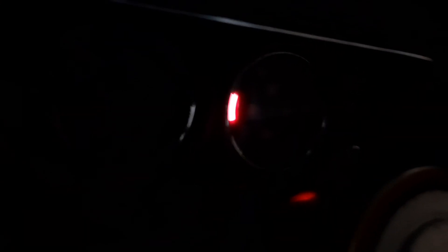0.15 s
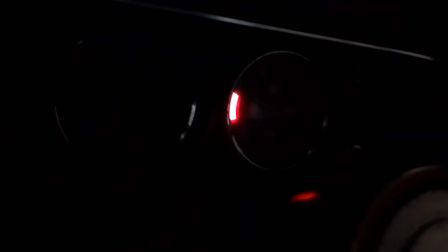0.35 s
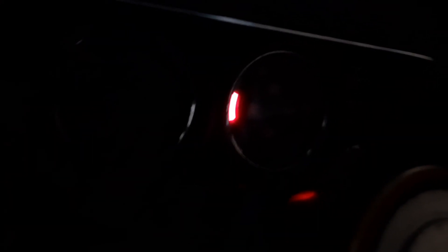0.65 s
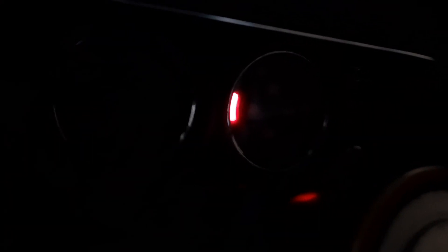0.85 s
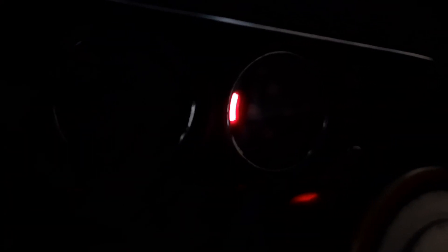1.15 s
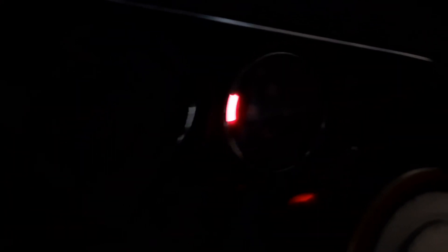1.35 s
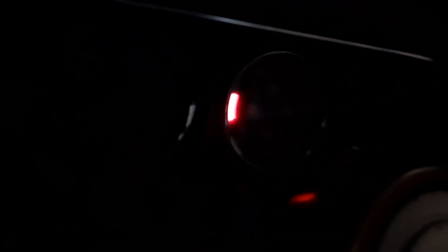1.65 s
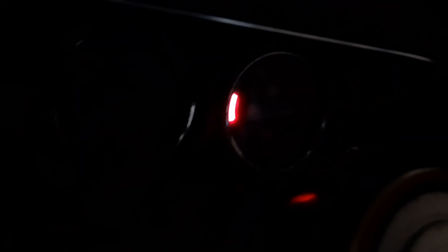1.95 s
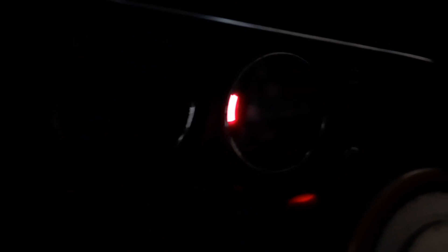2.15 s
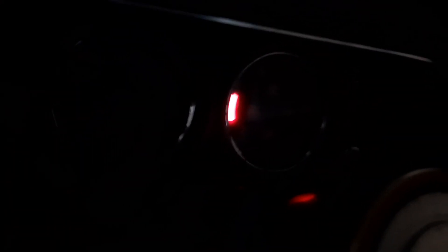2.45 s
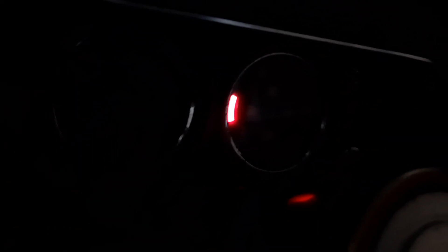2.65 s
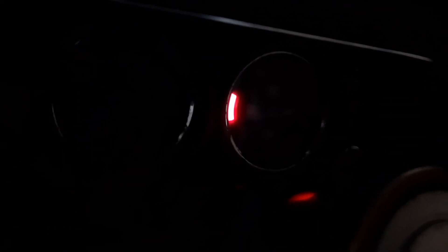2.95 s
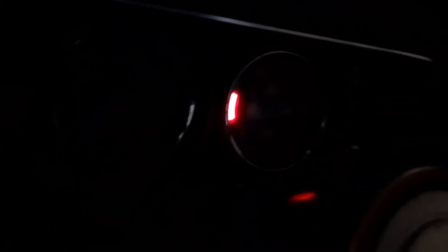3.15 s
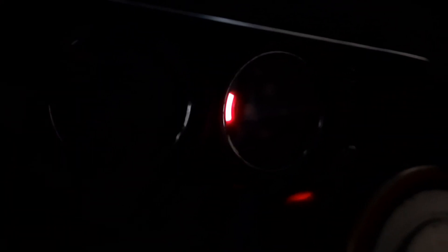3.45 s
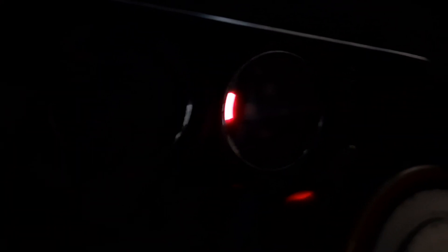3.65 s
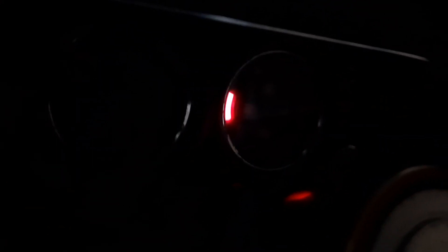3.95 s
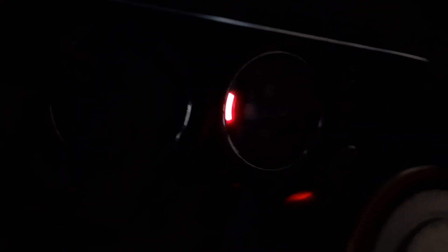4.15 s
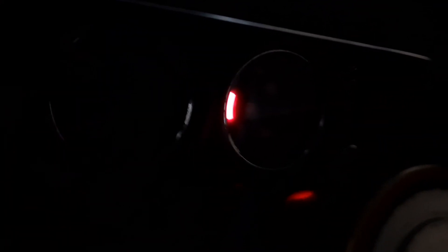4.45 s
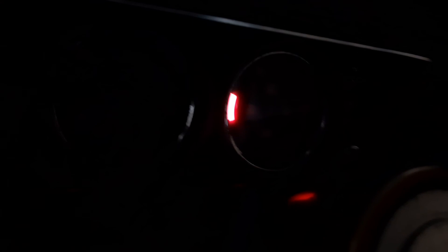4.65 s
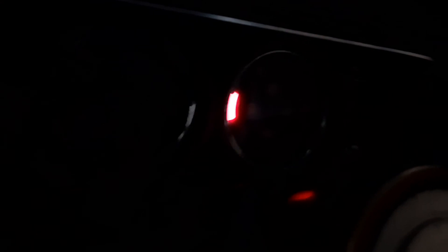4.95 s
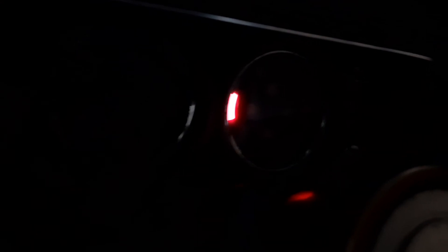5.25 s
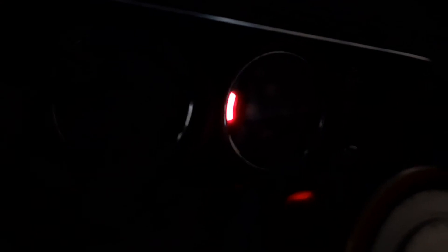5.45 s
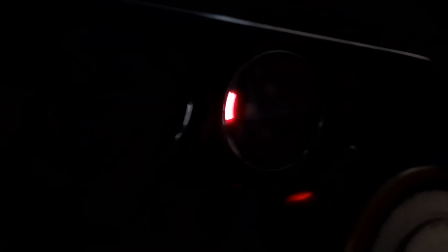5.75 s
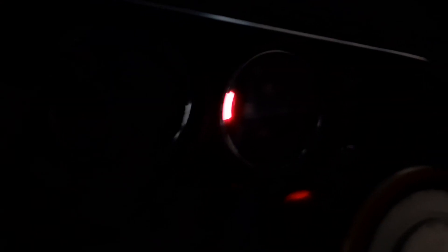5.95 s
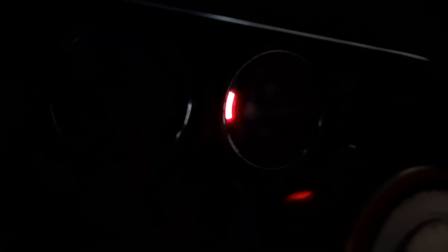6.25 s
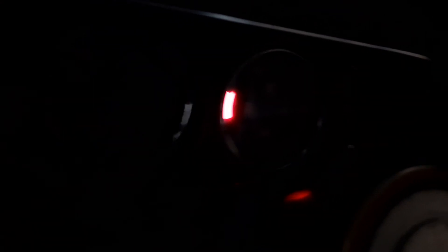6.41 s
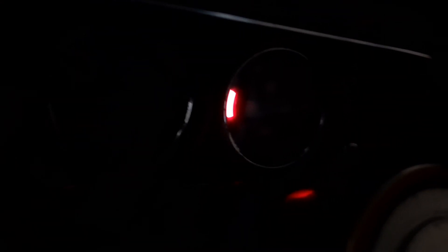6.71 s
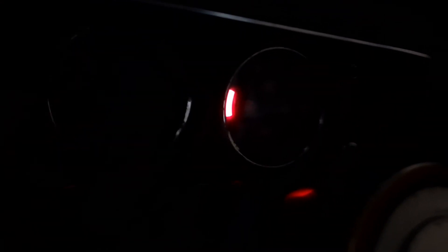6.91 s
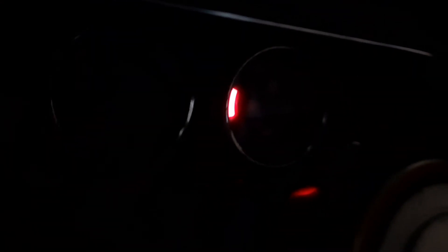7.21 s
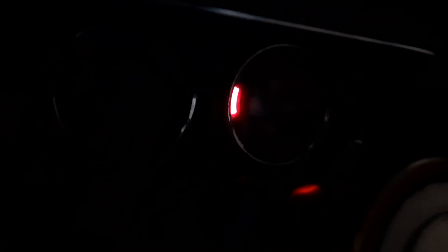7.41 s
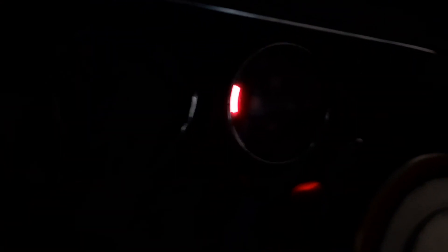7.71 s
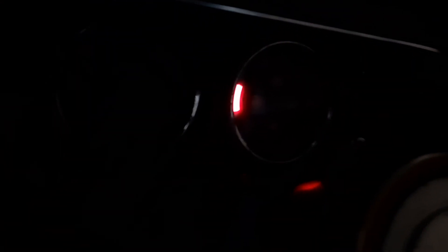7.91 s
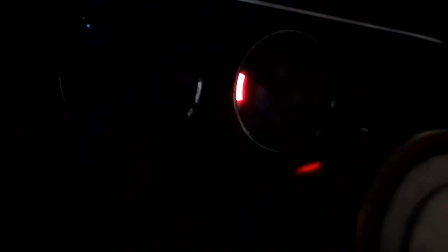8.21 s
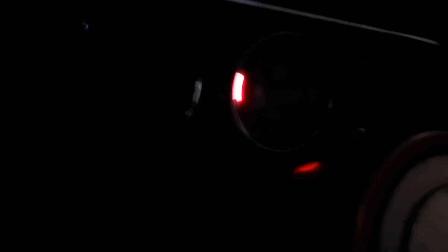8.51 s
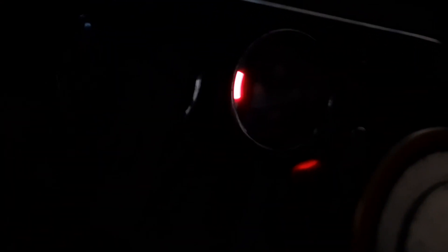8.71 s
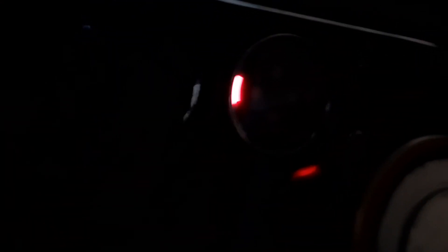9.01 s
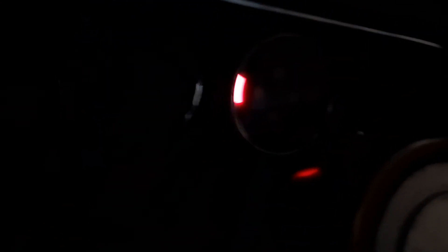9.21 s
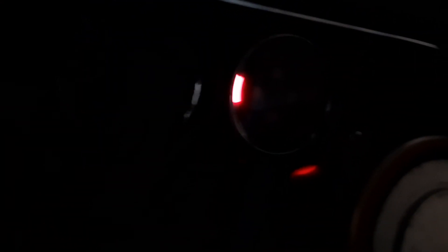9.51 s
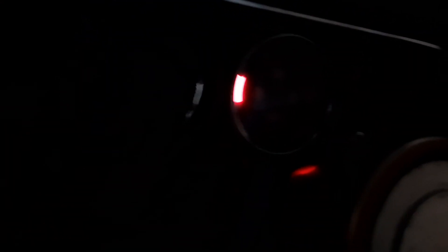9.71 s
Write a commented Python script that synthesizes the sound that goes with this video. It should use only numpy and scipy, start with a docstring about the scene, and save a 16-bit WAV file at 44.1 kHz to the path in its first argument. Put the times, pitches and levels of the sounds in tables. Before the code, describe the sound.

Heard from the driver's seat of an old car, the engine idles unevenly without stopping. A deep, lumpy exhaust rumble fills the cabin while the motor keeps faltering and popping, usually two or three quick pops in a row. Each spits and barks through a ringing, hollow muffler, stronger on the left. Low thuds, gurgles, valve ticks, soft hiss and thin metallic sizzle lie underneath.

```python
"""In front is the rough, lumpy rumble of an old car at idle, heard from the driver's seat: uneven firings ring the
exhaust and the cabin. Again and again the engine falters and the pipe pops, mostly in short runs at one pop a turn:
gas bursts spit and bark, the muffler rings, and the rumble surges after them. A few low cycles thud.
Beneath lie gurgling pipe resonances, noise for gas rush, hiss, valve ticks and a metallic sizzle,
stray plops, narrow-band belt chirps, one soft moan and a few light rustles."""
import sys
import numpy as np
from scipy import signal
from scipy.fft import rfft, irfft, next_fast_len
from scipy.io import wavfile
from scipy.ndimage import uniform_filter1d, map_coordinates

SR = 44100
rng = np.random.default_rng(int(sys.argv[2]) if len(sys.argv) > 2 else 0)


def dump_mix(stems):
    """Bounce the given channels to the path in sys.argv[1] as a 16-bit WAV at rate SR."""
    frames = np.atleast_2d(stems).T  # one column per channel
    limited = np.clip(frames, -1, 1)  # hard clip at full scale
    pcm = np.round(limited * 32767).astype(np.int16)
    wavfile.write(sys.argv[1], SR, pcm)


N = 435266

# Runs of exhaust pops, one pop a turn: start t/s, pops, turn/s, first boom level/dB, boom step/dB a pop,
# first bark level/dB, first spit level/dB, spit step/dB a pop.
# A lone pop has: t/s, boom level/dB, bark level/dB, spit level/dB. Each layer trims its own levels.
POP_RUNS = [(0.0474, -25, -30.5, -39.5), (0.1244, -23, -26, -34),
            (0.1994, 2, 0.065, -24.5, -7.5, -27, -53, -12), (0.32, 3, 0.0697, -30.5, -3.5, -36, -43.5, -10),
            (0.6135, -35, -43, -60), (0.7885, 2, 0.0658, -32.5, -2.5, -39, -50.5, -6.0),
            (1.0152, 2, 0.0671, -36, 3.5, -39.5, -57, 8),
            (1.262, 2, 0.0667, -28.5, -7.5, -35.5, -42.5, -18),
            (1.447, 2, 0.0715, -45, 10.5, -44.5, -46.5, 2.5),
            (1.5868, 3, 0.071, -27.5, -4, -31, -38.0, -14), (1.7726, 2, 0.0629, -36.5, 3, -44, -46.0, -4.0),
            (2.0602, -31.5, -37, -51), (2.2521, 2, 0.07, -29, 2, -35, -38.5, -5.5), (2.395, -35, -42, -55),
            (2.5481, -33, -41, -62), (2.7287, 2, 0.0678, -30.5, -3.5, -37, -43.5, -9),
            (3.024, 2, 0.0626, -30.5, -6.5, -38, -47.5, -16), (3.2127, -28.5, -34.5, -38),
            (3.283, 2, 0.072, -26.5, -9.5, -33, -47, -10), (3.5211, 3, 0.0644, -31.5, 0, -36, -42, -3.5),
            (3.7239, -24.5, -30.5, -37.5), (3.802, 2, 0.07, -24, -7, -29.5, -43.5, -8),
            (4.0286, 3, 0.0747, -33.5, 1, -40, -43, -2),
            (4.3837, 3, 0.0735, -25.5, -.3, -29.5, -39.5, -2.5), (4.606, -27, -32, -40.5),
            (4.6814, -21.5, -28.5, -36), (4.7565, 2, 0.07, -24.5, -11.5, -27, -59, -3),
            (4.9162, -36, -46, -56), (5.1534, 3, 0.0604, -32.5, -6, -37.5, -47.5, -12.0),
            (5.3453, 3, 0.0709, -30, -1, -35, -41.5, -5), (5.5963, -45, -47, -47.5),
            (5.6635, 2, 0.0649, -30.5, -4, -35.5, -42, -10.5),
            (5.8516, 3, 0.0696, -29.5, -5.5, -34, -41, -13.0),
            (6.1377, 2, 0.0661, -32, -5, -34, -49.0, -16), (6.3261, 2, 0.0699, -30, -1, -34, -40, -12),
            (6.6256, 2, 0.0725, -35, 1, -40, -47.5, 3), (6.778, -30, -35, -51), (6.888, -35, -36, -62),
            (6.9746, 2, 0.0729, -27, 3, -28, -38, -9), (7.1767, -30, -32.5, -51),
            (7.246, 2, 0.0751, -25.5, -5, -32, -44, -20), (7.4261, 2, 0.0658, -34.5, -0.5, -36, -44.5, -9),
            (7.6606, 2, 0.0629, -37.5, 2.5, -43, -67, 0.5), (7.8858, 2, 0.0629, -33, -3, -39.5, -60.0, 1),
            (8.0705, 2, 0.0731, -34, 2, -35.5, -45, 5),
            (8.2163, 2, 0.0702, -27.5, -4.5, -30.5, -39.5, -17.5),
            (8.399, 2, 0.0685, -38, 5, -37.5, -43.5, 1), (8.6496, 2, 0.0653, -30.5, -7, -35, -43, -5.5),
            (8.8914, 2, 0.065, -37, 2.5, -41.5, -48.5, 3.0),
            (9.135, 2, 0.0646, -34.5, -2, -35.5, -44, -12.5),
            (9.3645, 2, 0.0678, -37.5, 3.5, -42.5, -56, 6.5), (9.5513, -42, -43, -46.5),
            (9.6261, 2, 0.0704, -31.5, 4.5, -35, -39, -2.5), (9.7657, -36, -42, -60)]
# Resonances of the low exhaust note in pipe and cabin: f/Hz, width/Hz, level/dB
RUMBLE_MODES = [(37, 11.4, -1), (63, 8.3, 1), (83, 27, -3), (102.9, 11.4, -3)]
# Resonances of the throb above it: f/Hz, width/Hz, level/dB
THROB_MODES = [(132.2, 20, 0), (155.8, 24, -1.5), (190.3, 46, -8.5)]
# Slow swell of the rumble, before its trim: t/s, level/dB
RUMBLE_CURVE = [(0.0, -19), (0.1, -32), (0.6, -25.5), (0.7, -28.5), (1.5, -29.5), (2.2, -27), (2.9, -31),
                (3.0, -26), (3.2, -30.5), (3.4, -29), (3.6, -33), (3.85, -25), (4.2, -33.5), (4.9, -26),
                (5.1, -35), (5.2, -28), (6.2, -30.5), (6.6, -27), (6.7, -33.5), (6.9, -33.5), (7.1, -26.5),
                (8.1, -30), (8.2, -27), (8.4, -26), (8.8, -31), (9.87, -28)]
# Slow swell of the throb, before its trim: t/s, level/dB
THROB_CURVE = [(0.0, -28), (0.3, -33.5), (0.4, -23.5), (0.8, -39.5), (1.0, -31), (1.4, -33.0), (2.42, -30),
               (2.7, -37.5), (2.9, -32.5), (3.6, -35), (3.83, -29), (4.3, -37), (4.6, -30), (5.0, -33),
               (6.2, -35.5), (7.0, -34), (7.28, -24.5), (7.6, -35), (8.2, -31), (8.6, -35), (8.7, -32.5),
               (8.9, -44), (9.0, -37), (9.5, -34.5), (9.7, -29), (9.87, -35)]
# Heavy firings that thud in the cabin, before the thud trim: middle t/s, f/Hz, level/dB
THUD_HITS = [(0.191, 77, -19.5), (0.409, 68.2, -19.5), (0.515, 69.6, -18.5), (0.654, 72, -22.5),
             (0.915, 63, -24.5), (1.105, 66.6, -21), (1.615, 69.6, -26), (1.706, 66, -22),
             (1.897, 69.6, -19.5), (2.089, 58, -20.5), (2.205, 63, -20.5), (2.373, 67, -19),
             (2.446, 74.6, -24), (2.511, 61, -20.5), (2.577, 68.6, -22), (2.754, 64, -25.5),
             (3.047, 69, -21), (3.337, 58, -18.5), (3.784, 62.5, -18), (4.703, 68.5, -18.8),
             (4.811, 56.4, -23), (4.98, 63, -18), (5.18, 65.6, -20), (5.435, 71.6, -20.5),
             (5.536, 63, -24.5), (5.731, 70, -27), (5.882, 65.6, -24), (5.973, 68, -22), (6.166, 69, -24),
             (6.352, 65.3, -21), (6.457, 57.3, -21.7), (7.071, 85, -21), (7.159, 73, -20),
             (7.283, 82.4, -17), (7.35, 79, -20), (7.495, 64, -22.5), (7.583, 64, -23.5),
             (7.785, 68.4, -22), (8.238, 67.6, -18), (8.48, 72.5, -18.9), (9.454, 67, -23.5),
             (9.719, 64, -19.5), (9.819, 70.5, -25)]
# Ways from the valve to the seat: delay/s, level/dB, centre f/Hz, width/octaves
VALVE_TO_SEAT = [(.0055, -6, 1100, 2.4), (.0122, -5.5, 1100, 0.45), (.0175, 2.5, 430, 0.88),
                 (0.0272, 1, 600, 0.37)]
# Muffler resonances: f/Hz, width/Hz, level/dB
MUFFLER_MODES = [(281.4, 29, -4), (350.7, 20, 1), (430, 49, -0.5), (537, 33, -4.5), (610.4, 53, -8),
                 (650, 114, -14), (816, 40, -17), (1067, 55, -8), (1279, 18, -13), (1470, 110, -17),
                 (1915, 30, -14.5)]
# Colour of the bark from the pipe: f/Hz, relative level/dB per Hz
BARK_SPECTRUM = [(150, -40), (250, -22), (450, 1.5), (800, 4.5), (930, 1), (1100, 2.5), (1400, 1.5),
                 (1950, -5), (2200, -14), (3000, -22.5), (6000, -56)]
# Colour of the spitting gas: f/Hz, relative level/dB per Hz
SPIT_SPECTRUM = [(500, -18), (1100, -2.5), (2000, -3), (2550, -0.5), (3150, 2.5), (3900, -5.5),
                 (5500, -11.5), (6400, -13), (7500, -16), (9500, -24), (15500, -34)]
# Colour of the snap that opens a pop: f/Hz, relative level/dB per Hz
SNAP_SPECTRUM = [(2000, -12), (4200, -2), (6400, 7), (8500, -5.5), (12000, -5), (15500, -12)]
# Peaks and dips in the colour of the pipe: f/Hz, width/Hz, level/dB
PIPE_COLOUR = [(490, 35, -2.5), (535, 38, 1.5), (930, 61, -5.5), (1060, 87, 2.5), (1282, 24, 4.5),
               (1410, 55, 0.5), (1770, 70, -1), (1920, 70, 4)]
# Peaks and dips from sheet metal and cabin in the treble: f/Hz, width/Hz, level/dB
PANEL_COLOUR = [(2257, 45, 3.5), (2570, 39, 1), (2670, 30, 4.5), (2880, 60, -1), (3150, 130, 3),
                (3380, 70, -6.5), (3415, 60, 7), (3920, 55, 4.5), (5180, 60, 5), (6000, 150, 1),
                (6270, 120, 4)]
# Resonances that the gurgle rings: f/Hz, width/Hz, level/dB
GURGLE_MODES = [(286, 57, -5), (602.5, 46, -0.5), (760, 270, -15.5)]
# Spells in which the pipe burbles more: middle t/s, half length/s, rise level/dB
GURGLE_SPELLS = [(.25, .12, 10), (1.004, 0.21, 9), (1.619, .12, 2), (2.06, 0.23, 12), (3.682, 0.093, 3),
                 (4.7, .15, 8), (5.3, 0.24, 5.5), (7.094, 0.16, 12), (8.023, 0.15, 12), (9.602, 0.17, 3.5)]
# Stray plops in the pipe: start t/s, level/dB, centre f/Hz
STRAY_PLOPS = [(.937, -34, 800), (2.188, -41.5, 2580), (7.54, -43, 3000), (7.846, -28.5, 515),
               (7.991, -26, 580)]
# Colour of the gas rush: f/Hz, relative level/dB per Hz
RUSH_SPECTRUM = [(150, -46), (235, -8), (290, -2), (430, -3), (490, -5.5), (600, -10.5), (920, -10),
                 (1050, -14.5), (1200, -17), (1430, -16.5), (2430, -28), (3200, -29.5), (5000, -46)]
# Colour of the engine hiss: f/Hz, relative level/dB per Hz
HISS_SPECTRUM = [(1290, -13), (2200, -2), (2750, -6.5), (3110, -5.5), (4070, -8), (4840, -6.5), (5710, -12),
                 (7010, -7), (7990, -11.5), (8820, -24.5), (11000, -19.5), (11900, -15.5), (13000, -22),
                 (15700, -25)]
# Slow swell of the hiss, before its trim: t/s, level/dB
HISS_CURVE = [(0.0, -53.5), (1.2, -61), (1.8, -57.5), (1.9, -58.5), (2.4, -58), (3.1, -58.5), (3.3, -55),
              (3.5, -60), (3.6, -55.5), (4.3, -62), (4.7, -53.5), (5.2, -62.5), (5.4, -57.5), (6.2, -58.5),
              (6.4, -55.5), (6.5, -56.5), (7.5, -56), (7.8, -58.5), (8.2, -56), (9.6, -59), (9.7, -55),
              (9.87, -58)]
# Colour of the valve ticks: f/Hz, relative level/dB per Hz
TICK_SPECTRUM = [(800, -17), (2200, 8.0), (4500, 1.5), (7500, -1.5), (9500, -5.0), (15500, -8)]
# Sizzle after hard pops, before its trim: start t/s, length/s, level/dB
SIZZLE_SPELLS = [(.125, 0.8, -65), (1.52, 0.3, -61), (2.25, 0.32, -63), (3.209, 0.2, -61),
                 (3.52, 0.44, -62), (4.379, 0.17, -67), (4.606, .45, -60), (6.28, 0.28, -62),
                 (6.972, 0.58, -58), (8.074, 0.63, -59.5), (9.131, .2, -62), (9.618, .25, -61)]
# Colour of the sizzle: f/Hz, relative level/dB per Hz
SIZZLE_SPECTRUM = [(3000, -18), (6000, 1), (7400, 5.5), (8800, -3.5), (10800, -3), (12100, -1),
                   (13200, -2.5), (15500, -5)]
# Belt chirps: middle t/s, length/s, f/Hz, level/dB
BELT_CHIRPS = [(.575, 0.052, 7394, -56), (1.69, 0.061, 7260, -53), (1.8, 0.042, 7510, -57),
               (7.21, 0.055, 7730, -55), (8.66, 0.053, 7040, -56), (9.41, 0.048, 7170, -58)]
# Light rustles: middle t/s, length/s, level/dB
LIGHT_RUSTLES = [(0.164, 0.017, -45), (6.29, 0.012, -45), (6.714, .012, -54), (6.974, 0.024, -44),
                 (7.44, 0.029, -55), (7.626, .005, -47), (8.078, .007, -51)]
# Colour of the rustles: f/Hz, relative level/dB per Hz
RUSTLE_SPECTRUM = [(1000, -6), (4000, 1), (7500, -3), (10000, -8), (15000, -5)]
# Stereo lean of the pops, stronger in the ear nearer the pipe: f/Hz, left minus right level/dB
POP_LEAN = [(100, 0), (300, 14), (420, 19), (600, 3.5), (1000, 7.5), (2000, 8), (4000, 7.5), (12000, 7)]
# Stereo lean of the steady engine sounds: f/Hz, left minus right level/dB
BED_LEAN = [(100, 1.2), (300, 0.83), (420, 5.5), (600, 0.5), (1000, 6.4), (3000, 3.2), (6000, 3),
            (7500, 0.5), (8800, 7.4), (12000, 1.5), (15000, 2)]
# Likeness of the two ears before the lean: f/Hz, correlation
EAR_LIKENESS = [(35, 0.94), (70, 0.92), (160, 0.99), (300, 0.64), (600, 0.52), (1100, 0.018),
                (10000, 0.021)]

# Share of the boom and spit steps that the bark follows along a run
BARK_WITH_BOOM, BARK_WITH_SPIT = 0.9, 0.076
# Soft pops on the free turns: mean and scatter, before the layer trims
SOFT_POP_DB, SOFT_SCATTER_DB = -52, 3
# The falter peaks ahead of each run
FALTER_LEAD_S, FALTER_HALF_S = 0.034, 0.08
# A pop with this boom in the table gives a surge of 1
FULL_POP_DB = -26.5
THUD_HALF_S, THUD_TRIM_DB = 0.023, -3
TOP_HZ = 15820


def hard_pops():
    """Backfires of every run, one a turn, as rows: time, boom dB, bark dB, spit dB."""
    pops = []
    for run in POP_RUNS:
        if len(run) == 4:
            pops.append(run)
            continue
        start, count, turn, boom, boom_step, bark, spit, spit_step = run
        bark_step = BARK_WITH_BOOM * boom_step + BARK_WITH_SPIT * spit_step
        for k in range(count):
            pops.append((start + k * turn, boom + k * boom_step, bark + k * bark_step, spit + k * spit_step))
    return np.transpose(pops)


def firings(turn_s=0.068, jitter_s=0.0012):
    """Jittered firing times, four a turn; the hard pops mark whole turns of the crank."""
    pop_times = np.sort(hard_pops()[0])
    marks = np.r_[pop_times[0] - turn_s, pop_times, pop_times[-1] + 2 * turn_s]
    turns_between = np.maximum(np.round(np.diff(marks) / turn_s), 1)
    turns = np.r_[0, np.cumsum(turns_between)]
    times = np.interp(np.arange(0, turns[-1], 1 / 4), turns, marks)
    return np.abs(times + jitter_s * rng.standard_normal(len(times)))


def falter():
    """Dips of engine effort ahead of each run, as smooth humps that add where they overlap."""
    starts = np.array([run[0] for run in POP_RUNS]) - FALTER_LEAD_S
    t = np.arange(-SR // 4, SR // 4) / SR
    hump = np.exp(-(t / FALTER_HALF_S) ** 2)
    return signal.fftconvolve(impulses(starts, np.ones(len(starts))), hump, "same")


def surge(lag, length):
    """Extra effort that peaks lag seconds after each hard pop and adds up as power over a run."""
    times, boom_db = hard_pops()[:2]
    t = np.arange(SR) / SR
    hump = np.exp(-((t - lag) / length) ** 2)
    power = signal.fftconvolve(impulses(times, amp(boom_db - FULL_POP_DB) ** 2), hump)[:N]
    return np.sqrt(np.abs(power))


def driven(times, modes, lag, uneven, kick, turbulence, low_hz, high_hz):
    """Uneven pulses, kicked harder by pops, ring resonances lag seconds later; the slow level is evened to 1."""
    pop_times, boom_db = hard_pops()[:2]
    push = impulses(times + lag, 1 + uneven * rng.standard_normal(len(times)))
    push += kick * impulses(pop_times + lag, unit(amp(boom_db)))
    sideways = impulses(times + lag, rng.standard_normal(len(times)))
    pair = np.array([unit(push), unit(sideways)]) + turbulence * rng.standard_normal((2, N))

    def colour(hz):
        band = 1 / np.sqrt((1 + (low_hz / (hz + 1)) ** 12) * (1 + (hz / high_hz) ** 8))
        return resonances(modes, hz) * band

    out = spread(pair, colour, BED_LEAN)
    power = uniform_filter1d(out.mean(axis=0) ** 2, size=4000)
    power = uniform_filter1d(power, size=3000)
    return out / np.sqrt(np.abs(power) + 1e-6)


def exhaust_rumble(times, miss):
    """Firings ring the lumpy low note of pipe and cabin: it sags at a miss, thumps with pops and swells after."""
    thump, swell = surge(lag=0.049, length=0.049), surge(lag=0.28, length=0.041)

    def level(slow, trim_db, miss_db, thump_db, swell_db, lump_db):
        effort_db = thump_db * thump + swell_db * swell - miss_db * miss
        return amp(curve(slow) + trim_db + effort_db + lump_db * wobble(13))

    rumble = driven(times, RUMBLE_MODES, lag=0.01377, uneven=1.5, kick=0.93,
                    turbulence=0.42, low_hz=35.3, high_hz=128)
    throb = driven(times, THROB_MODES, lag=0.02495, uneven=0.72, kick=0.49,
                   turbulence=0.24, low_hz=101.0, high_hz=289)
    rumble_gain = level(RUMBLE_CURVE, trim_db=-1.5, miss_db=1.0, thump_db=1.7, swell_db=1.0, lump_db=0.7)
    throb_gain = level(THROB_CURVE, trim_db=0.65, miss_db=1.5, thump_db=2.46, swell_db=0.5, lump_db=1.7)
    return rumble * rumble_gain + throb * throb_gain


def thuds():
    """Heavy firings thud in the cabin: a few low sine cycles that swell and fade."""
    t = np.arange(-SR // 8, SR // 8) / SR
    swell = np.sqrt(2) * np.exp(-(t / THUD_HALF_S) ** 2)
    out = np.zeros(N + 2 * len(t))  # margins hold thuds at the edges
    phases = rng.uniform(0, 2 * np.pi, len(THUD_HITS))
    for (middle, hz, db), phase in zip(THUD_HITS, phases):
        first = round(middle * SR) + len(t) // 2
        out[first:][:len(t)] += amp(db + THUD_TRIM_DB) * swell * np.sin(2 * np.pi * hz * t + phase)
    return out[len(t):][:N]


def from_right(sound, lead_s=0.00017):
    """The low note reaches the right ear a little earlier, by a phase slope split between the ears."""
    return filtered(sound, lambda hz: np.exp(1j * np.pi * np.outer([-1, 1], hz) * lead_s))


def soft_pops(times, bark_db=-5, spit_db=-14):
    """Weak pops of random strength on turns clear of the hard ones, in the same rows."""
    turns = times[::4]
    db = SOFT_POP_DB + SOFT_SCATTER_DB * rng.standard_normal(len(turns))
    free = np.abs(turns[:, None] - hard_pops()[0]).min(axis=1) > 0.03
    return np.array([turns, db, db + bark_db, db + spit_db])[:, free]


def pop_boom(pops, window_s=0.024, trim_db=1.0, muffler_top_hz=2300, variety_db=2.5,
             detune=0.013, mode_scatter_db=2, size=8192):
    """Each pop rings the muffler a little differently, as gas heat varies, and arrives by several ways."""
    grid = np.fft.rfftfreq(size, 1 / SR)
    boom = np.zeros(N + size)
    chances = rng.standard_normal((pops.shape[1], 1 + len(VALVE_TO_SEAT) + len(MUFFLER_MODES)))
    for start, db, chance in zip(pops[0], pops[1], chances):
        hz = grid / (1 + detune * chance[0])
        ways = 0
        for (delay, way_db, centre, octaves), change in zip(VALVE_TO_SEAT, chance[1:]):
            band = np.exp(-0.5 * (np.log2((hz + 1) / centre) / octaves) ** 2)
            ways = ways + amp(way_db + variety_db * change) * np.exp(-2j * np.pi * hz * delay) * band
        # Scatter only the level column of the muffler modes
        modes = MUFFLER_MODES + np.outer(mode_scatter_db * chance[-len(MUFFLER_MODES):], [0, 0, 1])
        treble_loss = np.sqrt(1 + (hz / muffler_top_hz) ** 10)
        ring = irfft(ways * round_trips(hz) * resonances(modes, hz) / treble_loss)
        ring = ring * np.sqrt(window_s * SR) / np.linalg.norm(ring)  # rms 1 over the window
        boom[min(round(start * SR), N):][:size] += amp(db + trim_db) * ring
    return filtered(boom[:N], lambda hz: lean(POP_LEAN, hz))


def pop_gas(pops, bark_lag=0.00399, spit_lag=0.001204):
    """Gas bursts snap and spit through the sheet metal; the bark follows from the pipe."""
    times, _, bark_db, spit_db = pops
    snap_shape = puff_shape(rise=0.00013, t60=0.028, tail_db=-23, tail_t60=0.08)
    spit_shape = puff_shape(rise=0.0005, t60=0.075, tail_db=-14.5, tail_t60=0.33)
    bark_shape = puff_shape(rise=0.0007, t60=0.112, tail_db=-4, tail_t60=0.32)
    snap = shocks(times + spit_lag, spit_db - 5, snap_shape, gas=0.15, spectrum=SNAP_SPECTRUM, body=panels)
    spit = shocks(times + spit_lag, spit_db + 3.5, spit_shape, gas=0.05, spectrum=SPIT_SPECTRUM, body=panels)
    bark = shocks(times + bark_lag, bark_db - 2.0, bark_shape, gas=0.2, spectrum=BARK_SPECTRUM, body=pipe)
    return snap + spit + bark


def shocks(times, db, shape, gas, spectrum, body, mixing_s=0.025):
    """Each shock takes the same early reflections to the seat, then blurs into fresh, rushing gas."""
    early = (1 - gas) * np.exp(-np.arange(len(shape)) / SR / mixing_s)
    cracks = signal.fftconvolve(impulses(times, amp(db))[None], echoes(shape * early), axes=1)[:, :N]
    rushing = puffs(times, db, shape * (1 - early)) * rng.standard_normal((2, N))
    pair = cracks + rushing
    return np.std(pair) * spread(pair, lambda hz: amp(along(spectrum, hz)) * body(hz), POP_LEAN)


def echoes(shape, count=6, size=90):
    """Two dense reflection patterns, whitened and reshaped in turn to decay along a power shape."""
    pair = np.sqrt(shape) * rng.standard_normal((2, len(shape)))
    for _ in range(count):
        pair = irfft(np.exp(1j * np.angle(rfft(pair))), len(shape))  # even colour
        power = np.abs(uniform_filter1d(pair ** 2, size=size))
        pair = pair * np.sqrt(shape / (power + 1e-14))
    return pair


def round_trips(hz, trip_s=0.0168, echo=0.49, loss_hz=620):
    """Sound runs up and down the pipe, losing treble each trip: a comb of hollow tones."""
    return 1 / (1 - echo * np.exp(-2j * np.pi * hz * trip_s) / np.sqrt(1 + (hz / loss_hz) ** 2))


def pipe(hz):
    """Hollow colour of pipe sound: the round-trip comb with extra peaks and dips."""
    return round_trips(hz) * tinted(PIPE_COLOUR, hz)


def panels(hz):
    """Tinny colour that sheet metal and cabin resonances give the treble."""
    return tinted(PANEL_COLOUR, hz)


def gurgle(times, miss, base_db=-47, miss_db=2):
    """One pulse a turn rings gurgling pipe resonances, more strongly in spells."""
    t = np.arange(N) / SR
    rise_db = sum(db * np.exp(-((t - middle) / half) ** 2) for middle, half, db in GURGLE_SPELLS)
    ring = driven(times[::4], GURGLE_MODES, lag=0.03, uneven=0.3, kick=0.24,
                  turbulence=0.42, low_hz=240, high_hz=900)
    return amp(base_db + rise_db - miss_db * miss) * ring


def plops(t60=0.05, rise=0.0005, octaves=0.49, size=8192):
    """A few stray plops in the pipe: short band-limited gas bursts that decay quickly."""
    t, hz = np.arange(size) / SR, np.fft.rfftfreq(size, 1 / SR)
    envelope = (1 - np.exp(-t / rise)) * amp(-60 * t / t60)
    out = np.zeros((2, N + size))
    for start, db, centre in STRAY_PLOPS:
        band = np.exp(-0.5 * (np.log2((hz + 1) / centre) / octaves) ** 2)
        gas = unit(irfft(rfft(rng.standard_normal(size)) * band))
        sides = amp(db + np.array([[2], [-2]]))  # louder on the left
        out[:, round(start * SR):][:, :size] += sides * gas * envelope
    return out[:, :N]


def engine_bed(times, miss, scatter_db=3, rush_pulsing=0.27, hiss_pulsing=0.28, waver_db=1.3, lump_db=2.5):
    """Turbulent rush and hiss flutter with the firings, sink at a miss and rise with effort, the rush most."""
    effort = surge(lag=0.041, length=0.11)
    shape = puff_shape(rise=0.0012, t60=0.055, tail_db=-16, tail_t60=0.074)
    beat = unit(puffs(times, scatter_db * rng.standard_normal(len(times)), shape))

    rush = amp(-40.5 - 1.0 * miss + 3.5 * effort)
    rush = rush * unit(1 - rush_pulsing + rush_pulsing * beat)
    rush = rush * unit(amp(lump_db * wobble(70)))

    hiss = amp(curve(HISS_CURVE) + 3.0 - 1.5 * miss + 0.1 * effort + waver_db * wobble(15))
    hiss = hiss * unit(1 - hiss_pulsing + hiss_pulsing * beat)
    return rush * noise(RUSH_SPECTRUM, BED_LEAN, pipe) + hiss * noise(HISS_SPECTRUM, BED_LEAN, panels)


def valve_ticks(times, tick_db=-63, scatter_db=3.5, lag=0.0077, loose_db=5):
    """Noise bursts tick after each firing; one loose valve ticks harder, once a turn."""
    loose = np.arange(len(times)) % 4 == 3
    db = loose_db * loose + scatter_db * rng.standard_normal(len(times))
    ticks = puffs(times + lag, db, puff_shape(rise=0.0003, t60=0.029, tail_db=-8, tail_t60=0.06))
    return amp(tick_db) * unit(ticks) * noise(TICK_SPECTRUM, BED_LEAN)


def sizzle(attack=0.012, release=0.06, grain_db=2.5, flutter_db=2.7, trim_db=-1.2):
    """Fine metallic noise, like a loose heat shield, flutters in spells after hard pops."""
    t = np.arange(N) / SR
    spells = 0
    for start, length, db in SIZZLE_SPELLS:
        fade = np.exp(-np.maximum(t - start - length, 0) / release)
        spells = spells + amp(db) * np.clip((t - start) / attack, 0, 1) * fade
    grain = unit(amp(grain_db * wobble(500) + flutter_db * wobble(35)))
    return amp(trim_db) * spells * grain * noise(SIZZLE_SPECTRUM, BED_LEAN, panels)


def bump(middle, length):
    """A smooth swell and fade, peak 1."""
    t = np.arange(N) / SR
    return np.exp(-2 * ((t - middle) / length) ** 2)


def belt_chirps(width_hz=350):
    """The belt chirps faintly: slow random slip modulates a high sine into a narrow band."""
    envelope = sum(amp(db) * bump(middle, length) for middle, length, _, db in BELT_CHIRPS)
    middles, _, pitches, _ = np.transpose(BELT_CHIRPS)
    pitch = np.interp(np.arange(N) / SR, middles, pitches)
    slip = unit(filtered(rng.standard_normal((2, N)), lambda hz: 1 / (1 + (hz / width_hz) ** 4)))
    return envelope * slip * np.sqrt(2) * np.sin(2 * np.pi * np.cumsum(pitch) / SR)


def moan(middle=6.49, half_s=0.083, hz=880, db=-44):
    """One soft, hollow moan: a sine roughened by a smooth random curve."""
    t = np.arange(N) / SR
    return amp(db) * np.exp(-((t - middle) / half_s) ** 2) * wobble(170) * np.sin(2 * np.pi * hz * t)


def rustles():
    """Light rustles near the seat, as brief swells of coloured noise."""
    envelope = sum(amp(db) * bump(middle, length) for middle, length, db in LIGHT_RUSTLES)
    return envelope * noise(RUSTLE_SPECTRUM, BED_LEAN)


def puff_shape(rise, t60, tail_db, tail_t60):
    """Power of one puff, peak 1: it swells, dies quickly and lingers in the cabin."""
    t = np.arange(SR // 4) / SR
    decay = amp(-60 * t / t60) ** 2 + amp(tail_db - 60 * t / tail_t60) ** 2
    power = (1 - np.exp(-t / rise)) ** 2 * decay
    return power / power.max()


def puffs(times, db, shape):
    """Amplitude envelope of a train of gas puffs whose powers add."""
    return np.sqrt(np.abs(signal.fftconvolve(impulses(times, amp(db) ** 2), shape)[:N]))


def noise(spectrum, side, body=lambda hz: 1):
    """Stereo turbulence of a given colour, inside an optional resonant body."""
    return spread(rng.standard_normal((2, N)), lambda hz: amp(along(spectrum, hz)) * body(hz), side)


def spread(pair, colour, side):
    """Mix two signals to a set ear likeness, colour and lean them; the middle has rms 1."""
    def share(hz):
        turn = np.arccos(np.clip(along(EAR_LIKENESS, hz), -1, 1)) / 2
        return colour(hz) * np.array([np.cos(turn), np.sin(turn)])

    middle, sides = filtered(pair, share)
    out = filtered(np.array([middle + sides, middle - sides]), lambda hz: lean(side, hz))
    return out / np.std(out.mean(axis=0))


def lean(side, hz):
    """Left and right gains that average to 1 at each frequency."""
    gains = amp(np.outer([0.5, -0.5], along(side, hz)))
    return gains / gains.mean(axis=0)


def resonances(modes, hz):
    """Causal response of damped modes with alternating sign."""
    out = 0
    for k, (centre, width, db) in enumerate(modes):
        loss = 1j * hz * width
        out = out + (-1) ** k * amp(db) * loss / (centre * centre - hz * hz + loss)
    return out


def tinted(peaks, hz):
    """Causal response that is flat but for resonant peaks and dips."""
    out = 1
    for centre, width, db in peaks:
        stiff, loss = centre * centre - hz * hz, 1j * hz * width
        out = out * (stiff + loss * amp(db / 2)) / (stiff + loss * amp(-db / 2))
    return out


def filtered(x, response):
    """Apply a complex frequency response, with padding for its tail."""
    size = next_fast_len(N + SR // 2)
    return irfft(rfft(x, size) * response(np.fft.rfftfreq(size, 1 / SR)), size)[..., :N]


def impulses(times, sizes):
    """One spike at each time."""
    return np.bincount(np.clip(np.round(times * SR).astype(int), 0, N), sizes, N + 1)[:N]


def curve(points):
    """One value per sample, by straight lines between timed points."""
    return np.interp(np.arange(N) / SR, *np.transpose(points))


def wobble(rate):
    """A smooth random curve with rate knots a second."""
    knots = rng.standard_normal(int(N * rate / SR) + 4)
    return map_coordinates(knots, [np.arange(N) * rate / SR])


def along(points, hz):
    """Values between frequency points on a log axis."""
    f, values = np.transpose(points)
    return np.interp(np.log(hz + 1), np.log(f + 1), values)


def unit(x):
    """Scale to rms 1."""
    return x / np.sqrt(np.mean(x ** 2) + 1e-20)


def amp(db):
    """Decibels to gain."""
    return 10 ** (np.asarray(db) / 20)


def scene():
    """The idling car: exhaust and pops in front, engine and small cabin sounds beneath."""
    times, miss = firings(), falter()
    pops = np.hstack([hard_pops(), soft_pops(times)])
    low_note = from_right(exhaust_rumble(times, miss) + thuds())
    exhaust = low_note + pop_boom(pops) + pop_gas(pops) + gurgle(times, miss) + plops()
    engine = engine_bed(times, miss) + valve_ticks(times) + sizzle()
    return exhaust + engine + belt_chirps() + moan() + rustles()


def record(dry):
    """Cut everything from the band limit upwards."""
    return filtered(dry, lambda hz: hz < TOP_HZ)


dry = scene()
out = record(dry)
dump_mix(out)
```